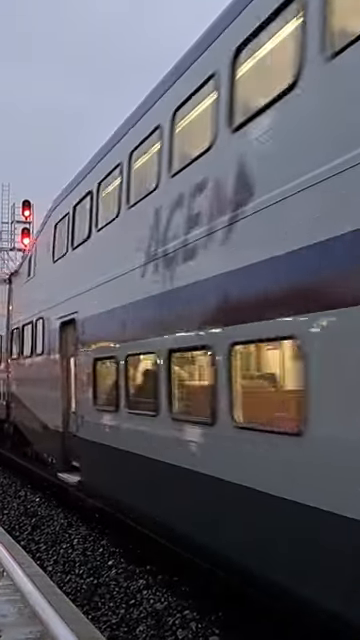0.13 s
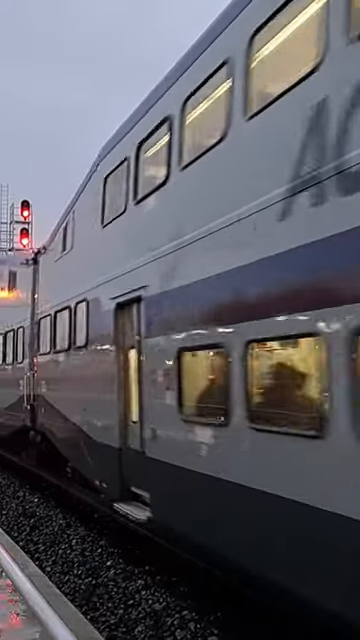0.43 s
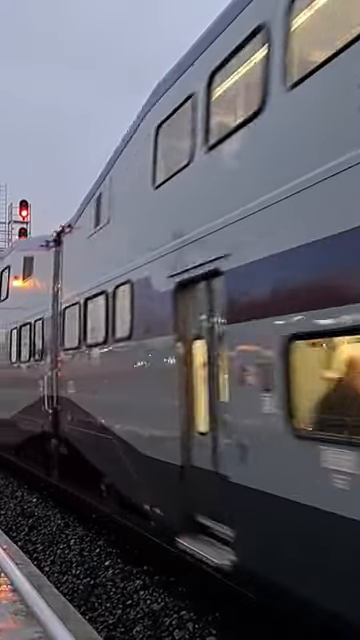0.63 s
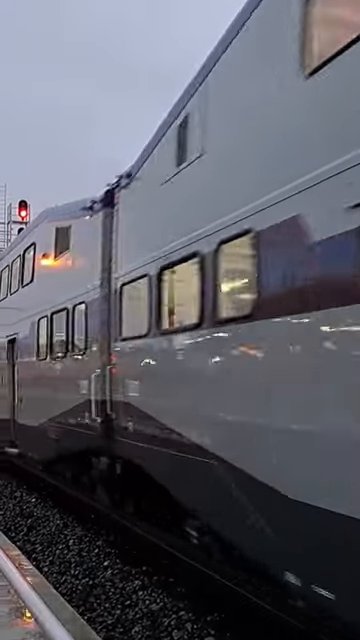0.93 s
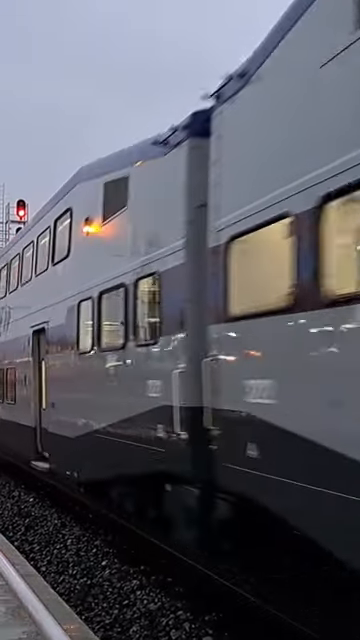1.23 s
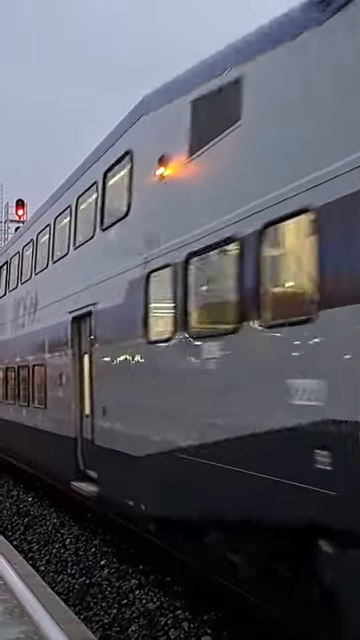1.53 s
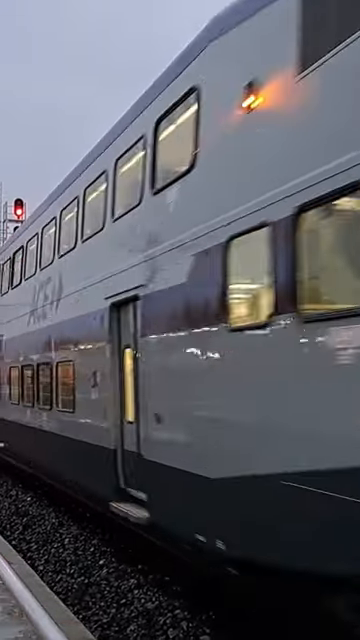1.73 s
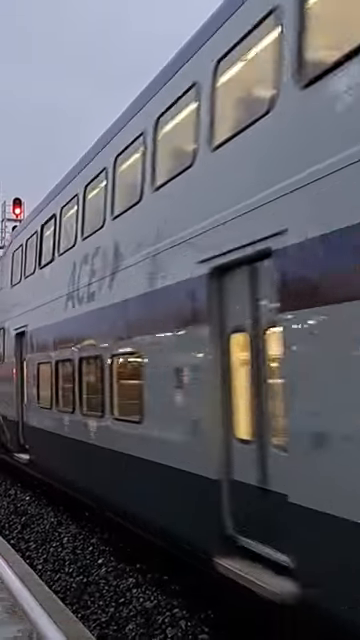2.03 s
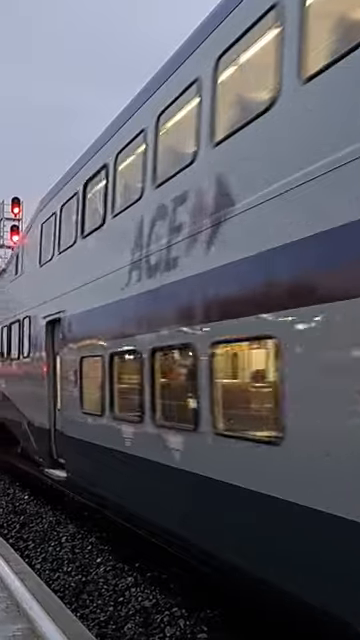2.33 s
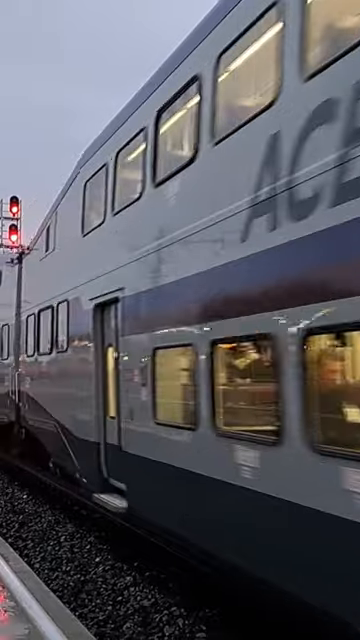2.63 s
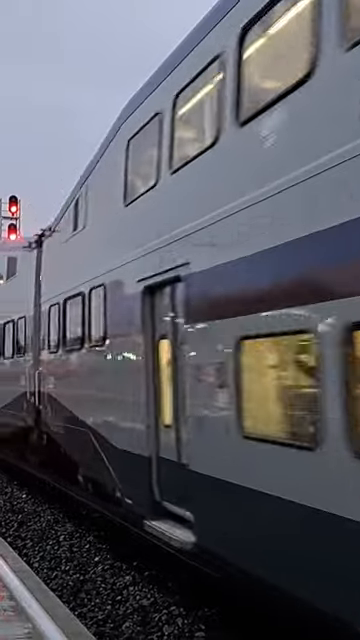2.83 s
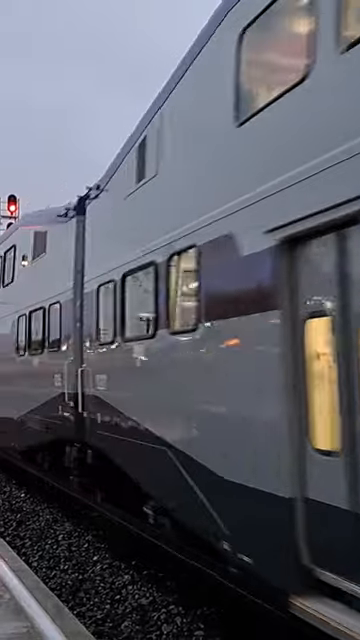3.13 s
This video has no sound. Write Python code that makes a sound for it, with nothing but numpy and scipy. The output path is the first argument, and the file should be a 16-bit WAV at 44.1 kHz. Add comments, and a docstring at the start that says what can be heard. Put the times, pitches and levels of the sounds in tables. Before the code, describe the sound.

A passenger train rolls by close to spaced stereo microphones at an open platform. Low, uneven rail roar runs throughout. At 0-0.4 s unsteady metallic wheel ringing near 2.3 kHz and airy hiss stand out, then fade. A knock at 1.3 s leads to a heavier surge at 1.55-1.8 s with thuds and knocks. Hollow booms follow near 1.8, 2.2, 2.4 and 2.7 s, with faint wheel tones, rattles and light ticks.

```python
"""A passenger train rolls past the platform edge, close to two spaced microphones.
Track: noise shaped by ground, sleepers and rail rumbles and roars as the bogies come and go, with booms and knocks.
Wheels: broad resonances ring faintly in noise, and single modes sing as unsteady tones or brief glints.
Under the cars: air hisses as shaped noise, with rattles and soft puffs; small parts tick now and then."""
import sys
import numpy as np
from scipy import signal
from scipy.fft import rfft, irfft, next_fast_len
from scipy.io import wavfile
from scipy.ndimage import uniform_filter1d, map_coordinates

SR = 44100
rng = np.random.default_rng(int(sys.argv[2]) if len(sys.argv) > 2 else 0)


def int16_out(signal):
    """Quantize to a 16-bit WAV file."""
    q = np.round(np.clip(np.atleast_2d(signal).T, -1, 1) * 32767)
    wavfile.write(sys.argv[1], SR, q.astype(np.int16))


N = 144207  # samples

# Spaced pair, part common to both sides: (frequency [Hz], share of power [0-1])
COMMON_SHARE = [(40, 0.94), (100, 1), (150, 0.96), (350, 0.94), (700, 0.85), (1000, 0.56), (1300, 0.49),
                (1700, 0.18), (2600, 0.18), (5000, 0.1)]
# Colour difference of the two microphones: (frequency [Hz], left over right [dB])
MIC_BALANCE = [(60, -3), (78, 4.5), (100, -2), (130, 3), (170, -4), (220, 0.5), (290, -0.5), (380, -2),
               (490, -1.0), (640, -1.5), (830, -4.5), (1070, 1), (1390, -3), (1810, -1), (2360, 1),
               (3060, 0.5), (3980, -0.5), (5170, -4), (6730, -7), (8740, -3), (11400, 2), (14800, -1)]
LOW_CUT_HZ, TOP_HZ = 15, 15375
CEILING, KNEE = .75, 4  # rounding of peaks: limit [full scale], sharpness of the bend

# Air hiss under the cars, relative spectrum: (frequency [Hz], level [dB])
AIR_SPECTRUM = [(2060, -15), (3500, -6), (4080, -18), (4420, -4.5), (6680, -5.5), (7300, -5), (7750, -3.5),
                (8300, -10), (8700, -9.5), (11100, -12), (13100, -9.5), (14300, -15), (15200, -21.5)]
# Air hiss before its flutter: (time [s], level [dB])
HISS_LEVEL = [(0.0, -35), (0.09, -35.5), (0.33, -42), (0.38, -43.5), (0.47, -48.5), (0.86, -50),
              (0.93, -43.5), (1.27, -46), (1.45, -44.5), (1.97, -45.5), (2.07, -42.5), (2.09, -46),
              (2.31, -47), (2.56, -48.5), (2.81, -53), (3.26, -49.5), (3.27, -50)]
# Top of the hiss over its usual share: (time [s], lift [dB])
AIR_TOP_LIFT = [(0, 1.5), (.25, -2.5), (.33, -1), (.36, 4), (.39, -2), (.44, -0.5), (.86, 2), (.95, 2.5),
                (1.3, 1), (1.55, 2), (2.07, 0.5), (2.2, 4), (2.33, -1), (2.55, 1.5), (2.85, 1),
                (3.27, -0.5)]
AIR_SPLIT_HZ = 9000
# Rattles: highest level over the hiss and range below it, both before the air spectrum colours them
RATTLES, RATTLE_DB, RATTLE_SPREAD_DB, RATTLE_T60_S = 200, 4.5, 7, .02
RATTLE_HZ, RATTLE_OCTAVES = 3000, 2.2  # lowest centre, range above it
# Soft puffs of air: (time [s], peak level [dB], centre [Hz], left over right [dB])
AIR_PUFFS = [(.345, -37, 13500, 0), (1.44, -38, 9000, 0), (2.035, -36, 9000, 2), (2.06, -40, 8000, 4),
             (2.13, -37, 12550, 4)]
PUFF_T60_S, PUFF_Q, PUFF_RISE_S = 0.1, 0.65, .008

# Ticks of small parts: (time [s], peak level [dB], centre [Hz], left over right [dB], sharpness Q [1])
SMALL_TICKS = [(0.0774, -23.5, 9000, -3.5, 1), (0.332, -35, 7500, 1, .9), (0.7194, -37, 7490, -6, .9),
               (2.058, -32, 3860, 9, 1.6), (2.359, -33, 4170, -3, 3.1), (2.437, -32.5, 4340, -2, 1.4),
               (2.4585, -36, 8000, -3, .8), (2.5142, -40, 4160, -2, 1.6), (2.56, -35, 4200, 3, 2.2),
               (2.582, -33, 4150, -5, 4.5), (2.6094, -38, 4060, -4, 2.4), (2.8704, -36, 5500, 2, .9),
               (2.9646, -33, 4200, 9, 1.8), (3.07, -31.5, 6000, 4, .5)]
TICK_T60_S = 0.014
RISE_S = .0015  # of ticks, knocks and rattles

# Single wheel modes that sing for a while, one table each: (time [s], pitch [Hz], level [dB])
SINGING_MODES = [
    [(0, 2407, -38), (.17, 2300, -38.5), (.35, 2287, -42.5), (.6, 2270, -46.5), (.8, 2210, -82)],
    [(.7, 1790, -74), (.9, 1774, -49), (1.4, 1790, -51), (1.8, 1773, -48), (2.1, 1770, -84)],
    [(1.8, 1980, -80), (2.05, 1988, -48), (2.4, 1962, -43), (2.65, 1930, -54), (2.9, 1925, -80)],
    [(.9, 3300, -80), (1.15, 3260, -50), (1.55, 3230, -50.5), (2.05, 3190, -52), (2.35, 3200, -80)],
    [(1.2, 3040, -80), (1.4, 2970, -50), (1.85, 2960, -51), (2.3, 2880, -47), (2.6, 2920, -80)],
    [(1.3, 3940, -89), (1.6, 3850, -53), (2.3, 3906, -52), (2.9, 3830, -57), (3.27, 3770, -54)],
]
SING_WAVER, SING_FLUTTER_DB = .024, 4.5  # sizes of the random curves; waver as a share of the pitch
# Wheel modes that ring out briefly, level before the swell: (time [s], level [dB], pitch [Hz])
WHEEL_GLINTS = [(.025, -33, 2370), (.085, -33, 1760), (.135, -36, 1860), (.165, -29, 2310),
                (.24, -34, 2290), (.41, -41, 2270)]
GLINT_T60_S, GLINT_RISE_S = 0.1, 0.0048

# Rolling noise under the wheel ring, relative spectrum: (frequency [Hz], level [dB])
WHEEL_BED_SPECTRUM = [(530, -23), (900, -19.5), (1600, -3), (1930, 0.5), (2390, -5.5), (2630, -12),
                      (4600, -21.5), (5980, -37), (10100, -120)]
# Broad wheel resonances, relative levels: (centre [Hz], width [Hz], level [dB])
WHEEL_RESONANCES = [(1265, 470, 2.5), (1824, 80, -3.5), (1970, 210, -8), (2343, 205, -5), (2984, 115, -15),
                    (3230, 84, -12), (3860, 410, -16.5), (4190, 130, -18)]
# Wheel ring before its slight waver: (time [s], lower ring level [dB], upper ring level [dB])
WHEEL_LEVELS = [(0.0, -30.5, -35.5), (0.14, -33, -36.5), (0.39, -36.5, -42), (0.62, -38.5, -46),
                (0.83, -38.5, -44), (1.66, -33.5, -40), (1.98, -35, -41.5), (2.27, -36, -42),
                (2.7, -41, -47.5), (2.91, -40.5, -48.5), (3.27, -38.5, -45.5)]
MODES_DB = 2.5  # modes over their bed, before the two ring bands are levelled
WHEEL_SPLIT_HZ = 2320  # between lower and upper ring

# Rolling train: (time [s], sleeper thud level [dB], upper roar level [dB], left microphone lag [ms])
ROLLING_LEVELS = [(0.0, -21, -28, 0.33), (0.03, -23.5, -28, 0.35), (0.16, -34, -30, 0.53),
                  (0.18, -23.5, -31, 0.37), (0.33, -33, -31.5, 0.4), (1.19, -29.5, -31, 0.23),
                  (1.55, -22, -27.5, 0.29), (1.59, -16.5, -25, 0.33), (1.69, -26, -33.5, 0.28),
                  (1.72, -19.5, -24.5, 0.33), (1.95, -34, -30.5, 0.36), (2.29, -20.5, -32, 0.36),
                  (2.33, -39, -36, 0.52), (2.35, -24, -31.5, 0.43), (2.97, -34, -35, 0.36),
                  (3.27, -28.5, -36.5, 0.27)]
# Ground rumble, relative spectrum: (frequency [Hz], level [dB])
GROUND_SPECTRUM = [(15, -60), (25, -22), (35, -36), (48, -6), (59, -3.5), (74, -5.5), (92, -11.5),
                   (110, -0.5), (200, -120)]
# Ground rumble: (time [s], level [dB])
GROUND_LEVELS = [(0.0, -34), (0.35, -29.5), (0.52, -41), (0.59, -29), (0.62, -42), (0.72, -32), (2.55, -36),
                 (3.2, -33.5), (3.27, -33)]
# Sleeper thud, relative spectrum: (frequency [Hz], level [dB])
SLEEPER_SPECTRUM = [(56, -46), (95, -14.5), (140, 3.5), (172, -1), (200, -0.5), (260, -9), (440, -120)]
# Rail roar, relative spectrum: (frequency [Hz], level [dB])
RAIL_SPECTRUM = [(110, -33.5), (180, -12), (210, -4.5), (286, -1.5), (398, -7.5), (445, -5.5), (520, -8),
                 (680, -33.5), (1140, -120)]
# Rail roar before its upper part is lifted: (time [s], level [dB])
ROAR_LEVEL = [(0.0, -20), (0.32, -17.5), (0.35, -26.5), (0.4, -19), (1.0, -23), (1.01, -25.5), (1.07, -16),
              (1.09, -22.5), (1.81, -17), (2.1, -17.5), (2.12, -30), (2.15, -16.5), (2.17, -24),
              (2.19, -17), (2.39, -19), (2.45, -14.5), (2.49, -26), (2.51, -19), (2.61, -20.5), (2.71, -17),
              (2.86, -23), (2.88, -16.5), (2.99, -25), (3.0, -27), (3.02, -19), (3.27, -23.5)]
# Upper part of the rail roar over its usual share: (time [s], lift [dB])
RAIL_UPPER_LIFT = [(0, 6), (.2, -2), (.6, -0.5), (1.2, 0.5), (1.5, 2.5), (1.65, -0.5), (1.8, 2.5),
                   (1.95, -0.5), (2.1, 0.5), (2.4, 3), (2.8, -3), (3.27, -1)]
RAIL_SPLIT_HZ = 380
# Separate upper roar of the rail, relative spectrum: (frequency [Hz], level [dB])
RAIL_TOP_SPECTRUM = [(300, -120), (430, -76), (520, -6.5), (640, -8), (800, -14), (980, -17.5),
                     (1150, -25.5), (2000, -120)]
# Rail booms under an axle, level before the swell: (time [s], level [dB], pitch [Hz])
RAIL_BOOMS = [(1.59, -16, 144), (1.835, -12, 288), (2.19, -14, 230), (2.43, -14.5, 312), (2.70, -12, 285.4),
              (2.875, -21, 292.5)]
BOOM_T60_S, BOOM_RISE_S = 0.25, .012
# Axle knocks on rough spots: (time [s], peak level [dB], centre [Hz], left over right [dB])
AXLE_KNOCKS = [(1.2492, -37, 1980, 4), (1.3294, -23, 1790, 1), (1.7268, -22, 2100, -1.5),
               (1.7434, -22, 1800, -2), (1.958, -22, 1350, -1), (2.3343, -24, 1240, 1),
               (2.4585, -28, 1310, -6)]
KNOCK_T60_S, KNOCK_Q = 0.023, 1.9


def amp(db):
    """Amplitude factor of a level in dB."""
    return 10 ** (np.asarray(db) / 20)


def unit(x):
    """x scaled to rms 1."""
    return x / np.sqrt(np.mean(x ** 2) + 1e-20)


def along(points, hz):
    """Values at hz from (frequency [Hz], value) points on a log axis."""
    f, v = np.transpose(points)
    return np.interp(np.log(hz + 1), np.log(f + 1), v)


def spectrum(points):
    """Amplitude response through (frequency [Hz], level [dB]) points."""
    return lambda f: amp(along(points, f))


def curves(rows):
    """One value per sample for each column after the time."""
    s, *cols = np.transpose(rows)
    return [np.interp(np.arange(N) / SR, s, c) for c in cols]


def wobble(rate):
    """A smooth random curve, rate knots a second."""
    knots = rng.standard_normal(int(N * rate / SR) + 4)
    return map_coordinates(knots, [np.arange(N) * rate / SR])


def filtered(x, response):
    """x times a response of frequency."""
    m = next_fast_len(N + SR // 2)
    return irfft(rfft(x, m) * response(np.fft.rfftfreq(m, 1 / SR)), m)[..., :N]


def below(x, split_hz):
    """The part of x below a steep split."""
    return filtered(x, lambda f: 1 / (1 + (f / split_hz) ** 12))


def lifted(x, split_hz, rows):
    """x with its part above split_hz raised by a (time [s], lift [dB]) curve."""
    lower = below(x, split_hz)
    return lower + amp(curves(rows)[0]) * (x - lower)


def rush(gain, patchy_db, size=512):
    """Patchy stereo noise of rms 1; its common part reaches the left microphone late.
    A longer frame size gives narrower, longer patches."""
    frames = dict(nperseg=size, noverlap=size * 3 // 4)
    hz, t, z = signal.stft(rng.standard_normal((3, N)), SR, **frames)
    s, lag_ms = np.transpose(ROLLING_LEVELS)[[0, -1]]
    # half the lag delays the left side, half advances the right
    late = np.exp(-1j * np.pi * hz[:, None] * np.interp(t, s, lag_ms) / 1000)
    share = np.clip(along(COMMON_SHARE, hz), 0, 1)[:, None]
    pair = np.sqrt(share) * z[0] * [late, 1 / late] + np.sqrt(1 - share) * z[1:]
    field = uniform_filter1d(rng.standard_normal(late.shape), size=3, axis=0)
    field = uniform_filter1d(field, size=12, axis=1)
    patchy = pair * amp(patchy_db * unit(field))
    noise = signal.istft(patchy, SR, **frames)[1][:, :N]
    return unit(filtered(noise, gain))


def clicks(rows, t60, q, order=1, rise_s=RISE_S):
    """Short noise bursts, each through one broad resonance and placed left or right."""
    out, t = np.zeros((2, N + SR)), np.arange(SR // 10) / SR
    envelope = amp(-60 * t / t60) * (1 - np.exp(-t / rise_s))
    for s, db, hz, pan_db in rows:
        edges = np.minimum(hz * 2 ** (np.array([-.5, .5]) / q), SR / 2.2)
        b, a = signal.butter(order, edges, "bandpass", fs=SR)
        burst = signal.lfilter(b, a, envelope * rng.standard_normal((2, len(t))))
        level = amp(db + np.array([[pan_db / 2], [-pan_db / 2]]))
        out[:, round(s * SR):][:, :len(t)] += burst / np.abs(burst).max() * level
    return out[:, :N]


def pings(rows, t60, rise_s):
    """Single modes that swell and die, from rows of (time [s], level [dB], pitch [Hz])."""
    out, t = np.zeros(N + SR), np.arange(SR // 4) / SR
    for s, db, hz in rows:
        ring = np.sin(2 * np.pi * (hz * t + rng.random()))
        out[round(s * SR):][:len(t)] += amp(db - 60 * t / t60) * (1 - np.exp(-t / rise_s)) * ring
    return out[:N]


def air():
    """Hiss under the cars swells and flutters as shaped noise; faint random rattles ride on it."""
    when, size, pitch, side = rng.random((RATTLES, 4)).T
    level_db = RATTLE_DB - RATTLE_SPREAD_DB * size
    centre_hz = RATTLE_HZ * 2 ** (RATTLE_OCTAVES * pitch)
    rows = np.c_[when * N / SR, level_db, centre_hz, 12 * (side - .5)]
    rattle = filtered(clicks(rows, RATTLE_T60_S, q=2.9), spectrum(AIR_SPECTRUM))
    hiss = rush(spectrum(AIR_SPECTRUM), patchy_db=1.4, size=1024)
    flutter_db = 0.29 * wobble(8.6) + 0.73 * wobble(22.28)
    level = amp(curves(HISS_LEVEL)[0] + flutter_db)
    return level * lifted(hiss + rattle, AIR_SPLIT_HZ, AIR_TOP_LIFT)


def puffs():
    """Soft bursts of air: broad high noise that swells quickly and dies."""
    return clicks(AIR_PUFFS, PUFF_T60_S, PUFF_Q, order=2, rise_s=PUFF_RISE_S)


def ticks():
    """Small parts tick: very short noise bursts, each with its own sharpness."""
    return sum(clicks([row[:4]], TICK_T60_S, row[4], order=2) for row in SMALL_TICKS)


def tone(hz, db):
    """A sine whose pitch wavers and level flutters at random."""
    wavering_hz = hz * (1 + SING_WAVER * wobble(70))
    level = amp(db + SING_FLUTTER_DB * wobble(38.6))
    return level * np.sin(2 * np.pi * np.cumsum(wavering_hz) / SR)


def singing_wheel():
    """Wheel modes stand out as unsteady tones, mostly sinking as the wheel rolls away, and brief glints."""
    # each microphone gets its own glint phases and its own waver and flutter
    glints = np.array([pings(WHEEL_GLINTS, GLINT_T60_S, GLINT_RISE_S) for side in "LR"])
    songs = sum(np.array([tone(*curves(rows)) for side in "LR"]) for rows in SINGING_MODES)
    return glints + songs


def wheel_response(f):
    """Sum of the wheels' broad resonance peaks."""
    return sum(amp(db) * (f * w) ** 2 / ((c * c - f * f) ** 2 + (f * w) ** 2)
               for c, w, db in WHEEL_RESONANCES)


def wheels():
    """Noise through the wheels' broad modes rings over a separate bed of rolling noise."""
    bed = rush(spectrum(WHEEL_BED_SPECTRUM), patchy_db=2.5)
    modes = rush(wheel_response, patchy_db=2.0, size=1024)
    ring = bed + amp(MODES_DB) * modes
    lower = below(ring, WHEEL_SPLIT_HZ)
    low_db, high_db = curves(WHEEL_LEVELS)
    waver = amp(0.33 * wobble(16))
    return waver * (amp(low_db) * unit(lower) + amp(high_db) * unit(ring - lower))


def track():
    """Ground, sleepers and rail each sound as separate noise with its own level; axles boom and knock."""
    thud_db, top_db, _ = curves(ROLLING_LEVELS)
    ground = amp(curves(GROUND_LEVELS)[0]) * rush(spectrum(GROUND_SPECTRUM), patchy_db=0.0)
    sleepers = amp(thud_db) * rush(spectrum(SLEEPER_SPECTRUM), patchy_db=0.0, size=4096)
    roar = rush(spectrum(RAIL_SPECTRUM), patchy_db=1.45, size=2048)
    rail = amp(curves(ROAR_LEVEL)[0]) * lifted(roar, RAIL_SPLIT_HZ, RAIL_UPPER_LIFT)
    top = amp(top_db) * rush(spectrum(RAIL_TOP_SPECTRUM), patchy_db=1.25)
    booms = pings(RAIL_BOOMS, BOOM_T60_S, BOOM_RISE_S)  # equal on both sides
    knocks = clicks(AXLE_KNOCKS, KNOCK_T60_S, KNOCK_Q, order=2)
    return ground + sleepers + rail + top + booms + knocks


def scene():
    """The passing train as it reaches the spaced pair at the platform."""
    return air() + puffs() + ticks() + singing_wheel() + wheels() + track()


def record(dry):
    """Two microphones of different colour drop the deepest bass, softly round peaks and end at a band limit."""
    def colour(f):
        balance = amp(np.outer([.5, -.5], along(MIC_BALANCE, f)))
        return balance * f ** 4 / (f ** 4 + LOW_CUT_HZ ** 4)

    mics = filtered(dry, colour)
    rounded = mics / (1 + np.abs(mics / CEILING) ** KNEE) ** (1 / KNEE)
    return filtered(rounded, lambda f: f < TOP_HZ)


dry = scene()
out = record(dry)
int16_out(out)
```